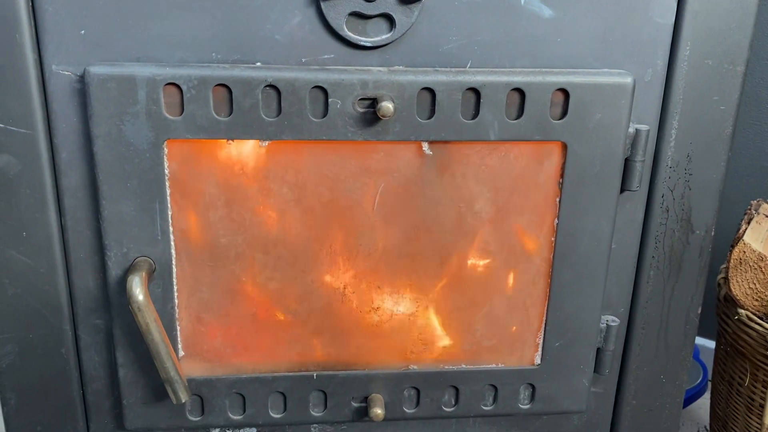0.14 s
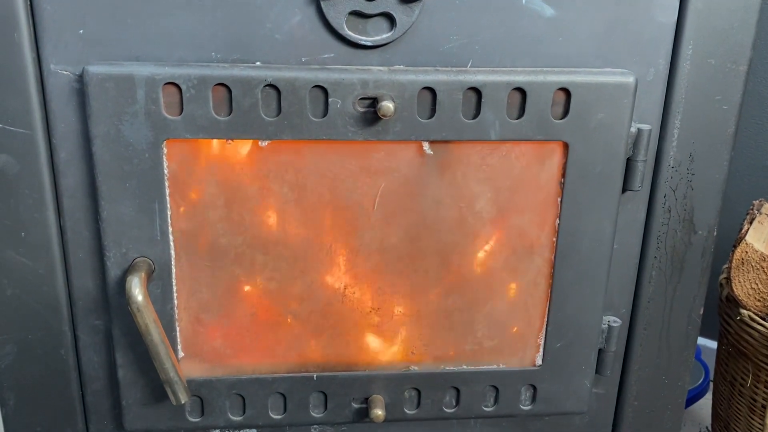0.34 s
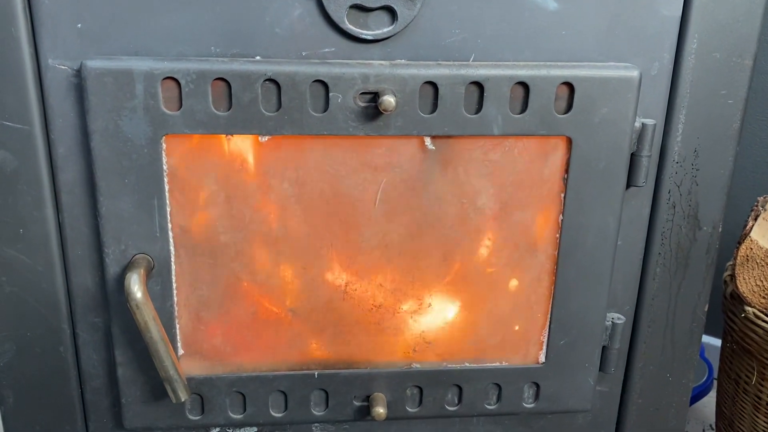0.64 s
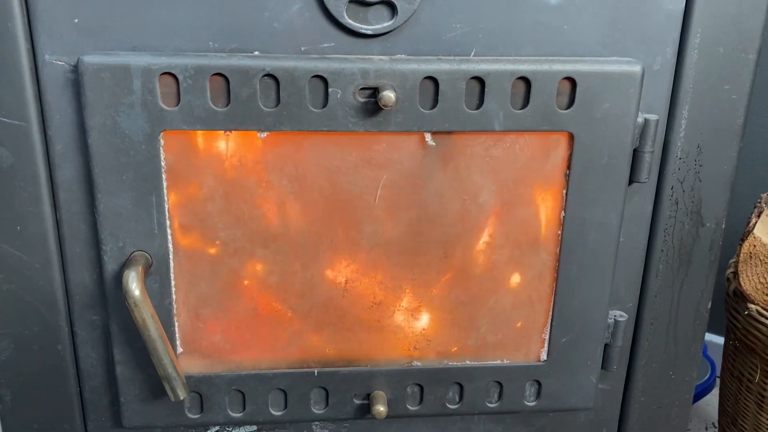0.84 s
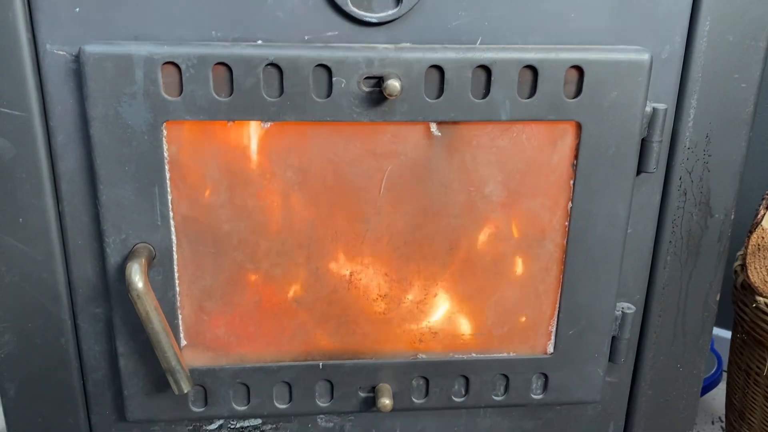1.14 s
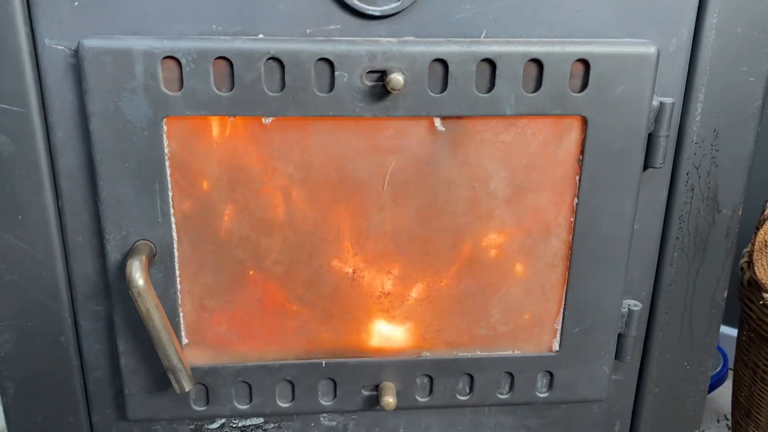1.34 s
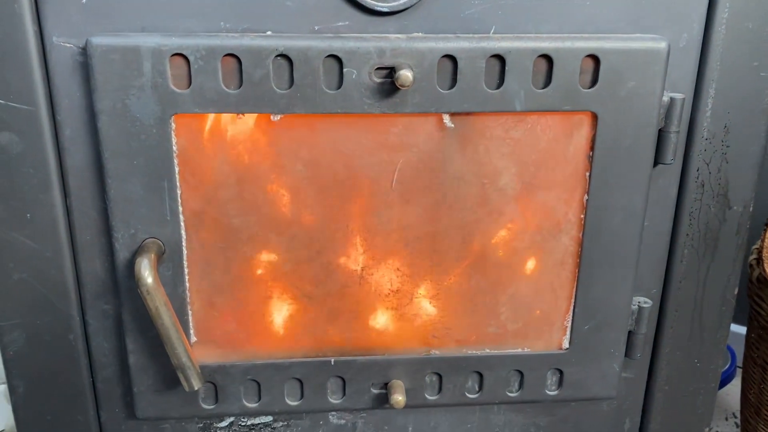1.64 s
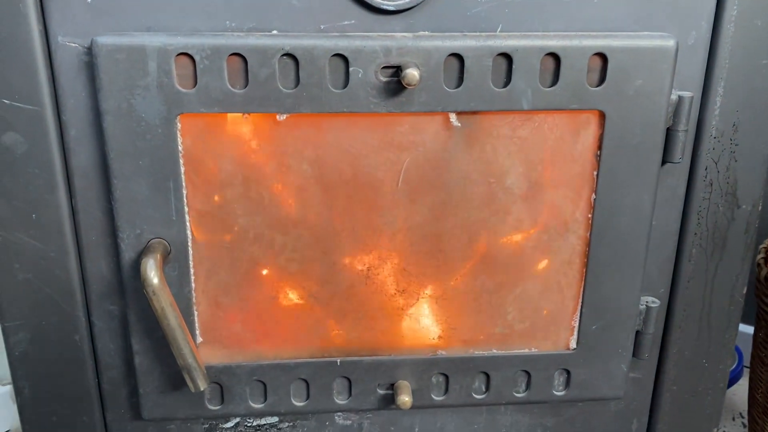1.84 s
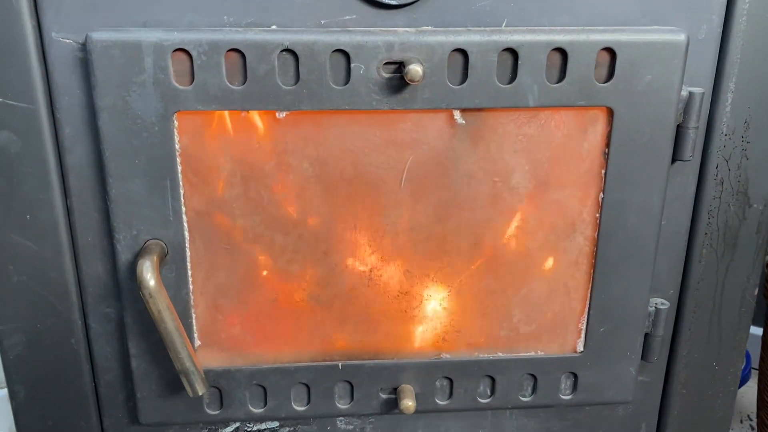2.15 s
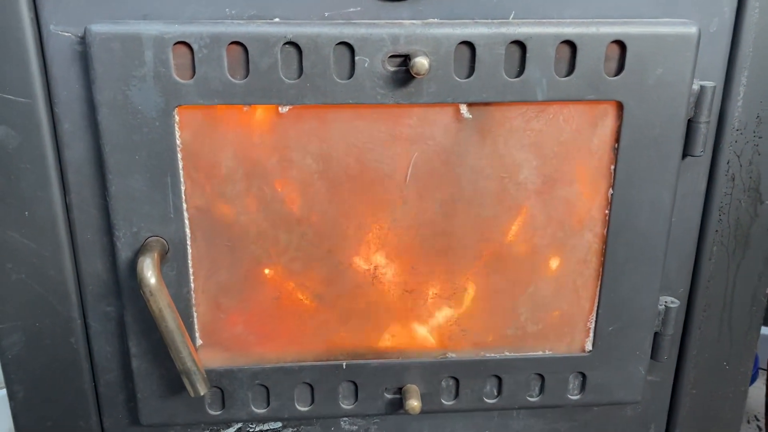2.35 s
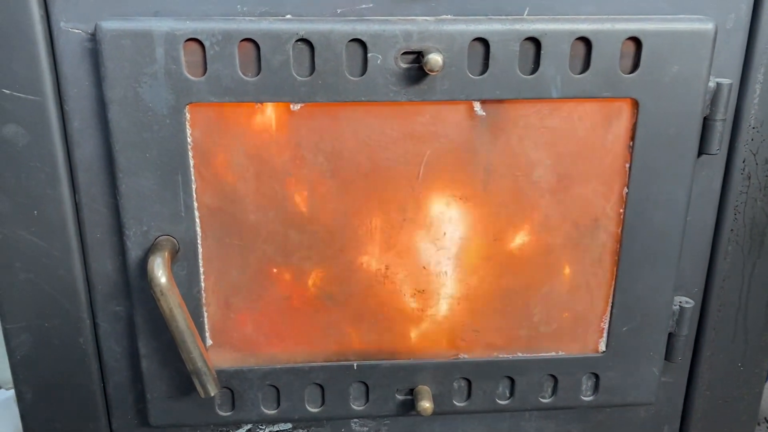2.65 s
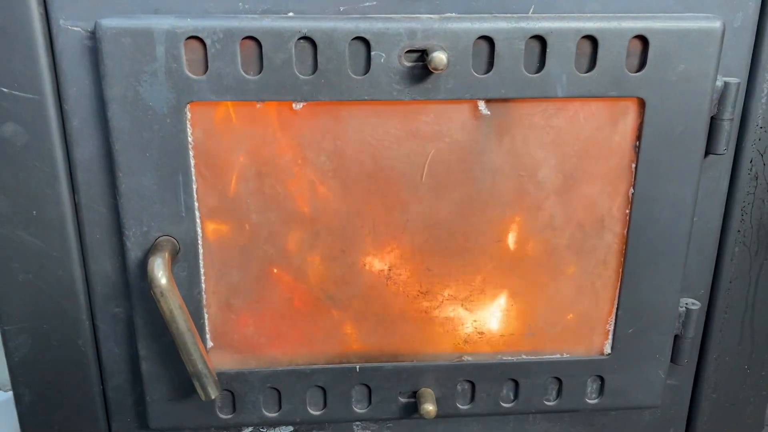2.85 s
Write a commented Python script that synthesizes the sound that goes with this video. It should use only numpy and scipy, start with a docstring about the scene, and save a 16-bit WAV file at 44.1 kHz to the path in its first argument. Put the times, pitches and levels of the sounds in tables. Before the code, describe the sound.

A wood fire crackles in an iron stove, heard close in a quiet room. Throughout, a faint, surging flue rumble sits under a soft wash of flames, with short hisses and scattered ticks. The loudest pop comes at about 0.75 seconds, briefly ringing the iron. Thinner snaps follow near 1.4 and 1.6 seconds, then another big pop near 2.4 seconds and a few more light ticks.

```python
"""A wood fire burns behind the glass door of an iron stove in a quiet room, heard from close by.
From the start, air drawn up the flue rumbles under a soft wash of flames, gas hisses out of the logs in
short jets, and the wood pops and ticks, making the iron box ring briefly. The level dips twice in the
first tenth of a second. The loudest pop comes at about 0.75 s, and another big one near 2.4 s."""
import sys
import numpy as np
from scipy import signal
from scipy.fft import rfft, irfft, next_fast_len
from scipy.io import wavfile
from scipy.ndimage import uniform_filter1d

SR = 44100
rng = np.random.default_rng(int(sys.argv[2]) if len(sys.argv) > 2 else 0)


def int16_out(signal):
    """Quantize to a 16-bit WAV file."""
    q = np.round(np.clip(np.atleast_2d(signal).T, -1, 1) * 32767)
    wavfile.write(sys.argv[1], SR, q.astype(np.int16))


N = 131418

# How hard the flue draws air. Each row: time in seconds, level of the rumble in dB.
DRAUGHT_LEVELS = [(0, -57.5), (.14, -56), (.2, -67), (.3, -55.5), (.4, -63.5), (.59, -53.5), (.7, -72.5),
                  (.79, -53), (.85, -58), (.9, -53.5), (.96, -63), (1.12, -69), (1.17, -53.5),
                  (1.23, -63.5), (1.28, -57.5), (1.4, -65), (1.52, -55.5), (1.63, -60.5), (1.69, -57),
                  (1.74, -59), (1.86, -50), (2.06, -61), (2.16, -54), (2.42, -62.5), (2.5, -60),
                  (2.6, -61.5), (2.9, -51), (2.98, -58.5)]


def amp(db):
    """Turns decibels into a number to multiply by."""
    return 10 ** (np.asarray(db) / 20)


def unit_power(x):
    """Scales x so that its average square is 1."""
    return x / np.sqrt(np.mean(x ** 2) + 1e-30)


def curve_at(points, hz):
    """Joins a table's points on a log frequency scale and gives the value at hz."""
    point_hz, value = np.transpose(points)
    return np.interp(np.log(hz + 1), np.log(point_hz + 1), value)


def grid(size):
    """Frequencies and times for overlapping frames of size samples."""
    hop = size // 4
    return np.fft.rfftfreq(size, 1 / SR)[:, None], np.arange(N // hop + 5) * hop / SR


def stereo_noise(gain, likeness, left_db):
    """Noise shaped by gain over frequency and time; likeness 1 puts the same noise on both sides."""
    size = 2 * (len(gain) - 1)
    a, b, c, d = rng.standard_normal(gain.shape[::-1] + (4,)).T
    left = a + 1j * b
    right = likeness * left + np.sqrt(1 - likeness ** 2) * (c + 1j * d)
    sound = signal.istft(np.array([left, right]) * gain, nperseg=size, noverlap=size * 3 // 4)[1]
    balance = amp([[left_db / 2], [-left_db / 2]])
    return balance * sound[:, :N] / np.sqrt(3 * size / 4)


def patches(shape, bins, frames):
    """Smooth random ups and downs over frequency and time."""
    field = rng.standard_normal(shape[::-1]).T
    return unit_power(uniform_filter1d(uniform_filter1d(field, bins, 0), frames, 1))


def draught():
    """Air drawn through the flue rumbles in surges."""
    # The rumble's tone. Each row: frequency in Hz, relative level in dB.
    flue_tone = [(25, -45), (36, -16), (48, -2), (60, 0), (70, -6), (82, -5), (110, -13), (220, -95)]
    hz, t = grid(size=8192)
    gain = unit_power(amp(curve_at(flue_tone, hz))) * np.ones(len(t))
    rumble = stereo_noise(gain, likeness=.93, left_db=2)
    power = (rumble ** 2).mean(0)
    loudness = np.sqrt(uniform_filter1d(uniform_filter1d(power, size=1200), size=1200))
    steady = unit_power(rumble / (loudness + .1))  # evened out, so the table sets the surges
    return steady * amp(np.interp(np.arange(N) / SR, *np.transpose(DRAUGHT_LEVELS)))


def flames():
    """Flames and room air make a soft, drifting wash that swells slowly with the draught."""
    # The wash's tone. Each row: frequency in Hz, relative level in dB.
    wash_tone = [(40, -45), (90, -5.5), (150, -2.5), (235, 3.5), (330, -9), (480, -8.5), (650, -16.5),
                 (1000, -26.5), (2500, -33), (6000, -41), (12000, -37), (16000, -51)]
    # How alike left and right are. Each row: frequency in Hz, likeness from 0 to 1.
    likeness = [(100, 0.97), (250, 1), (700, 0.18), (1200, 0.092), (3500, 0.27), (6000, 0.29)]
    level_db, drift_db, follow_share = -61.5, 2, .26
    hz, t = grid(size=1024)
    drift = drift_db * patches((len(hz), len(t)), bins=10, frames=12)
    draught_db = uniform_filter1d(np.interp(t, *np.transpose(DRAUGHT_LEVELS)), size=50)
    swell = follow_share * (draught_db - draught_db.mean())
    gain = unit_power(amp(curve_at(wash_tone, hz))) * amp(level_db + drift + swell)
    return stereo_noise(gain, curve_at(likeness, hz), left_db=5)


def gas_jets():
    """Pockets of gas hiss out of the logs: each opens quickly, then fades as it loses pressure."""
    # The jets. Each row: start in seconds, rise in seconds, top level in dB before the tone is added,
    # fall in dB per second, low-end boost in dB, treble boost in dB.
    jets = [(.0, 0.018, -63.5, 100, 10, -7.5), (0.327, 0.0034, -86.5, 400, -7, 18.5),
            (0.449, 0.0061, -67.5, 143, -9, -20), (0.641, 0.031, -60, 185, 0.5, -11),
            (.716, 0.0039, -74.5, 602, 18, 7.5), (0.749, 0.0019, -58, 128, 14.5, -7.5),
            (0.891, 0.051, -55.5, 166, -1.5, -6), (1.063, 0.0067, -56, 178, -7, -15.5),
            (1.251, 0.013, -58.5, 109, 4, -12), (1.602, 0.057, -52, 193, -5, -10.5),
            (1.654, 0.01, -53, 178, 7.5, -6), (1.766, 0.027, -54.5, 48.5, 6, -6),
            (1.958, 0.02, -55.5, 95, 6, -15.5), (2.368, 0.015, -57.5, 55, 4.5, -10),
            (2.484, 0.014, -44, 398, -3, -13), (2.499, 0.017, -55, 117, 3, -13),
            (2.694, 0.021, -59, 140, -5, -18), (2.723, 0.025, -69, 128, 10, 0.5),
            (2.8, 0.046, -71.5, 33, -3, -8)]
    # The tone all jets share. Each row: frequency in Hz, boost in dB.
    jet_tone = [(250, 13), (600, 6), (1500, 5), (2700, 5), (4500, 7.5), (7000, 3), (11000, 2.5),
                (15000, -1.5)]
    # How alike left and right are. Each row: frequency in Hz, likeness from 0 to 1.
    likeness = [(300, 0.32), (1200, 0.025), (3000, 0.36), (6000, 0.04)]
    low_hz, mid_hz, treble_hz, whistle_width_hz = 740, 2685, 10100, 300
    hz, t = grid(size=256)
    power = np.zeros((len(hz), len(t)))
    whistle_shape = np.exp(-.5 * ((hz - mid_hz) / whistle_width_hz) ** 2) - .5
    for start, rise, top_db, fall, low_db, treble_db in jets:
        opening = np.clip((t - start) / max(rise, .002), 0, 1)
        level = np.sin(np.pi / 2 * opening) ** 2 * amp(top_db - fall * np.maximum(t - start - rise, 0))
        tilt_db = curve_at([(low_hz, low_db), (mid_hz, 0), (treble_hz, treble_db)], hz)
        whistle_db = -.4 * min(treble_db, 0) * whistle_shape  # duller jets whistle more
        power += (level * amp(curve_at(jet_tone, hz) + tilt_db + whistle_db)) ** 2
    flicker_db = 2 * patches(power.shape, bins=4, frames=20)
    gain = np.sqrt(power) * amp(flicker_db) * (hz > 300)
    return stereo_noise(gain, curve_at(likeness, hz), left_db=1)


def wood_pop(peak_db, centre_octaves, width_octaves):
    """Wood fibres split in a flurry of clicks: a dry crack, and the iron box rings."""
    # The notes the iron box rings at. Each row: frequency in Hz, relative level in dB.
    stove_notes = [(155, -10), (235, -9), (310, -10), (435, -8), (650, -3), (825, 1), (960, -1), (1185, -4),
                   (1350, -4), (1570, -5), (1800, -5), (2670, 1), (3050, 1), (3480, -5)]
    splits_per_s, split_fade_s, crack_fade_s = 2500, .0012, .0022
    scatter_db, crack_db, left_db = 1.5, 6, 6.5
    t = np.arange(4096) / SR
    hz, note_db = np.transpose(stove_notes)[:, :, None]
    note_db = note_db + scatter_db * rng.standard_normal((2, len(hz), 1))
    white = rng.standard_normal((3, len(t)))
    splits = white[0] * (rng.random(len(t)) < splits_per_s / SR) * np.exp(-t / split_fade_s) / 3
    splits[0] = 1
    knock = .35 * amp(min(peak_db + 28, 0))  # only the loudest pops shake the whole box

    def tone(f):
        """A hump around the pop's own pitch, on top of an even floor."""
        distance = (np.log2((f + 1) / 1000) - centre_octaves) / max(width_octaves, .2)
        return .03 + knock + np.exp(-.5 * distance ** 2)

    ring_s = .03 * (1000 / hz) ** .6  # time to fade by 60 dB: high notes die sooner
    lag_s = np.array([[[0]], [[.00016]]]) * (hz < 2200)  # lower notes come late on the right
    behind = 1.1 * np.arange(len(hz))[:, None]  # each note starts 1.1 radians behind the one below
    notes = tone(hz) * amp(note_db - 60 * t / ring_s) * np.sin(2 * np.pi * hz * (t - lag_s) - behind)
    ring = signal.fftconvolve(notes.sum(1), splits[None, :400], axes=1)[:, :len(t)]
    crack_hz = np.fft.rfftfreq(len(t), 1 / SR)
    crack_spectrum = rfft(white[1] + .5 * white[1:]) * tone(crack_hz) * (crack_hz > 500)
    crack = irfft(crack_spectrum) * np.exp(-t / crack_fade_s)
    sound = (ring + amp(crack_db) * crack) * np.minimum(t / .0001, 1)
    return sound / abs(sound).max() * amp(peak_db + np.array([[left_db / 2], [-left_db / 2]]))


def crackle():
    """The burning wood pops at set times, with faint ticks scattered at random."""
    # The pops. Each row: start in seconds, peak in dB before the left-right balance,
    # centre of the tone in octaves above 1 kHz, its width in octaves.
    pops = [(0.013, -39, 1, 1.4), (0.2279, -57, 0.5, .7), (.330, -62, -1.5, 0.56), (0.3388, -62, 6, 1.6),
            (.613, -62, 2.5, 0.69), (0.7495, -22, 0.08, 0.6), (0.8022, -47, 3.5, 1),
            (1.068, -63.5, 0.9, 0.32), (1.082, -58.5, 2.5, 0.32), (1.103, -53.5, 0.7, 0.67),
            (1.135, -48, 3.5, 0.28), (1.21, -61.5, 1.87, 0.81), (1.262, -49, 3.5, 0.99),
            (1.357, -35, 4, 0.94), (1.417, -57.5, 1.84, 0.88), (1.439, -55.5, 3.5, 0.26),
            (1.648, -35.5, 3.5, 0.48), (1.9741, -41.5, 2.5, 0.59), (2.059, -50.5, 3, 0.2),
            (2.244, -42, 3, .4), (2.366, -26.5, 2.3, 1.13), (2.4916, -50, 1.2, 0.41),
            (2.7031, -56.5, 1.3, 0.22), (2.939, -43, 3.5, 0.49)]
    ticks_per_s, faintest_db = 10, -74
    draws = rng.random((40, 3))[:int(ticks_per_s * N / SR)]
    ticks = [(when * N / SR, faintest_db - 2.5 * np.log(softness), 1 + 2.5 * pitch, .7)
             for when, softness, pitch in draws]
    out = np.zeros((2, N + 4096))
    for start, *settings in pops + ticks:
        at = round(start * SR)
        out[:, at:at + 4096] += wood_pop(*settings)
    return out[:, :N]


def room_echo(sound):
    """The room adds a short tail of echoes in which high sounds die first."""
    # How long the room rings. Each row: frequency in Hz, seconds to fade by 60 dB.
    fade_times = [(300, 0.76), (8000, 0.11)]
    hz, t, spectrum = signal.stft(rng.standard_normal((2, SR // 2)), SR, nperseg=256)
    fade = amp(-60 * t / curve_at(fade_times, hz)[:, None])
    tail = signal.istft(spectrum * fade, SR, nperseg=256)[1]
    return signal.fftconvolve(sound, tail / np.linalg.norm(tail[0]), axes=1)[:, :N]


def scene():
    """Rumble, flames, jets and crackle together; only the crackle echoes."""
    wood = crackle()
    return draught() + flames() + gas_jets() + wood + amp(-15) * room_echo(wood)


def record(dry):
    """The microphone takes both sides' treble from one opening and dulls the top; the level dips twice."""
    # Brief dips in level. Each row: start in seconds, end in seconds.
    dips = [(0.0248, .0458), (0.0687, .0918)]
    shared_from_hz, in_step_hz, left_lag_s = 6300, 6850, .000232
    dull_from_hz, cutoff_hz, dip_db = 14000, 16400, -31
    size = next_fast_len(N + 2048)
    hz = np.fft.rfftfreq(size, 1 / SR)
    left, right = rfft(dry, size)
    share = np.clip((hz - shared_from_hz) / 500 + .5, 0, 1)
    late_right = right * np.exp(-2j * np.pi * (hz - in_step_hz) * left_lag_s)
    left = np.sqrt(1 - share ** 2) * left + share * late_right
    dulling = amp(curve_at([(dull_from_hz, 0), (cutoff_hz, -16)], hz))
    out = irfft(dulling * np.array([left, right]), size)[:, :N]
    t = np.arange(N) / SR
    for start, end in dips:
        out[:, (t > start) & (t < end)] *= amp(dip_db)
    low_pass = signal.firwin(511, cutoff_hz, window=("kaiser", 9), fs=SR)
    return signal.oaconvolve(out, low_pass[None], "same")


dry = scene()
out = record(dry)
int16_out(out)
```